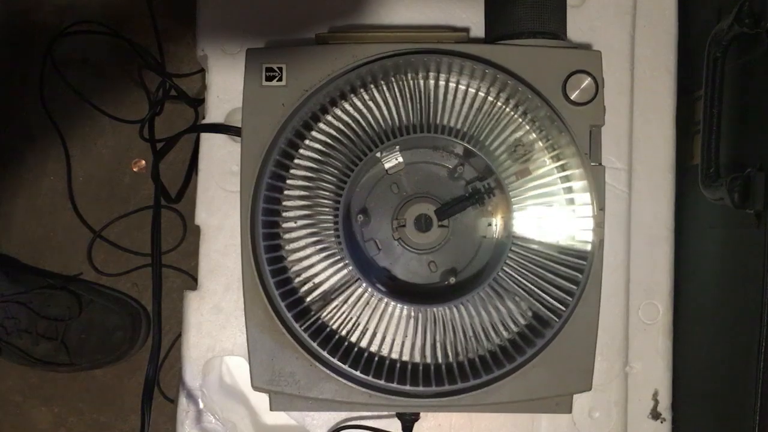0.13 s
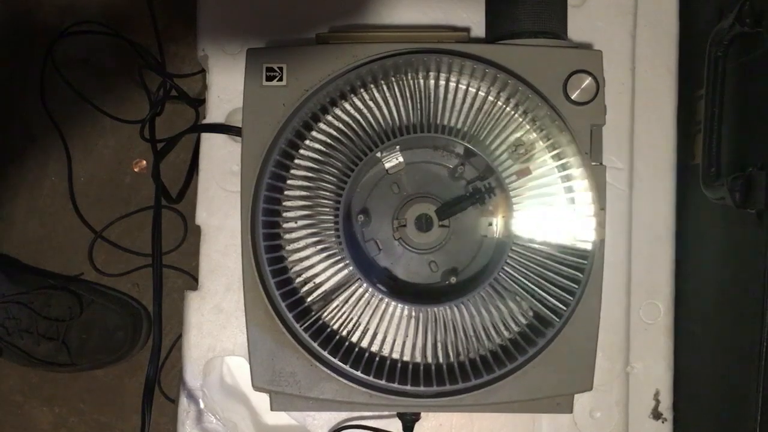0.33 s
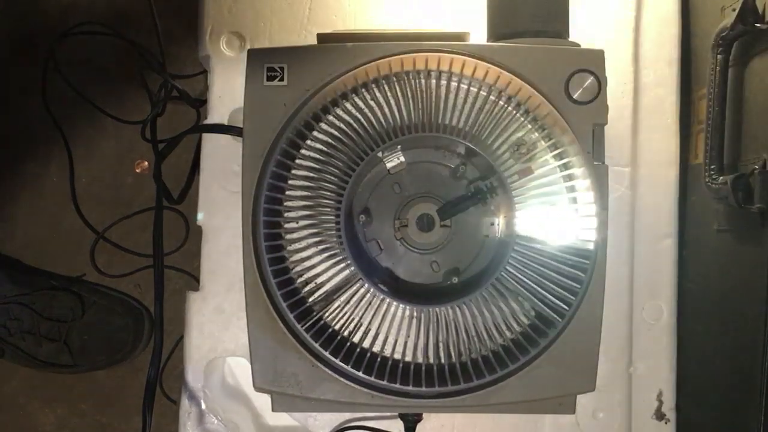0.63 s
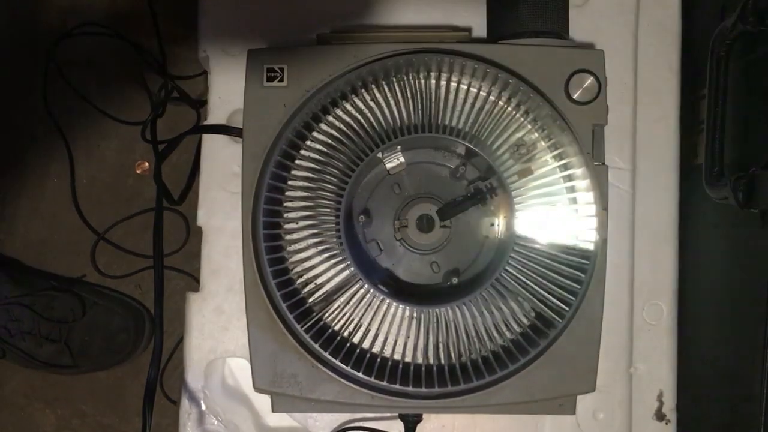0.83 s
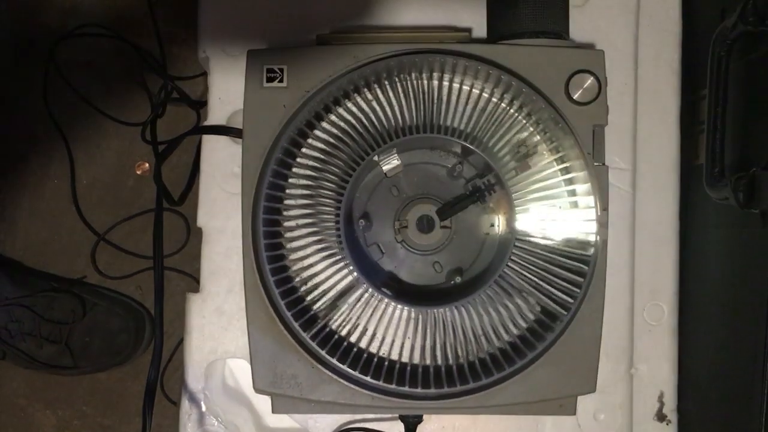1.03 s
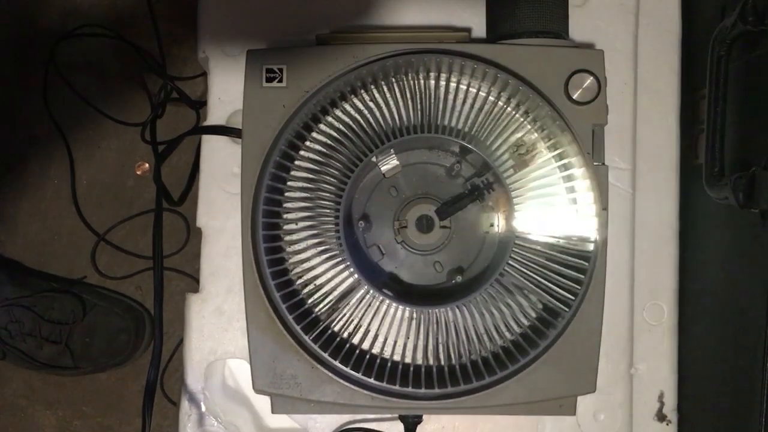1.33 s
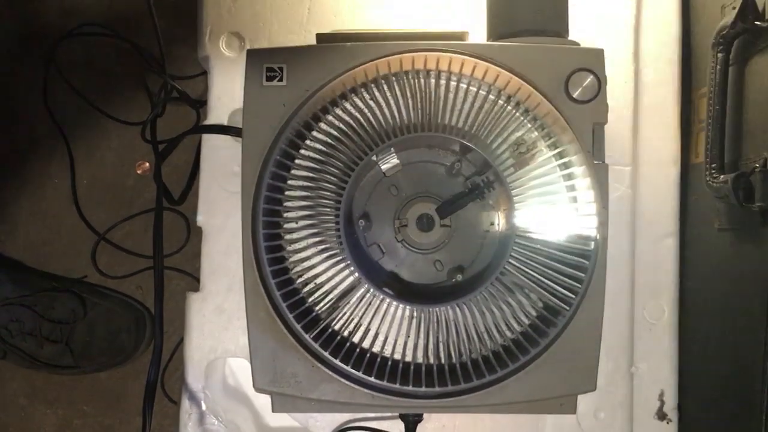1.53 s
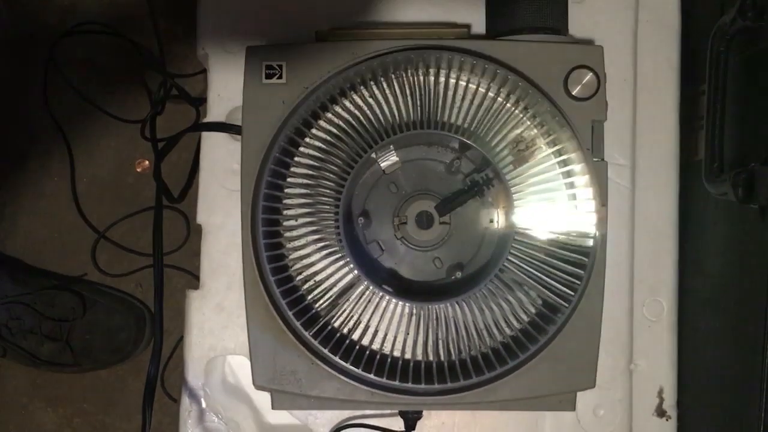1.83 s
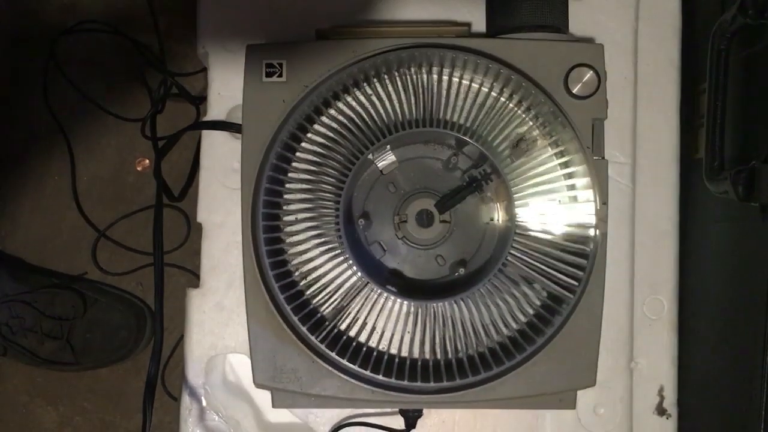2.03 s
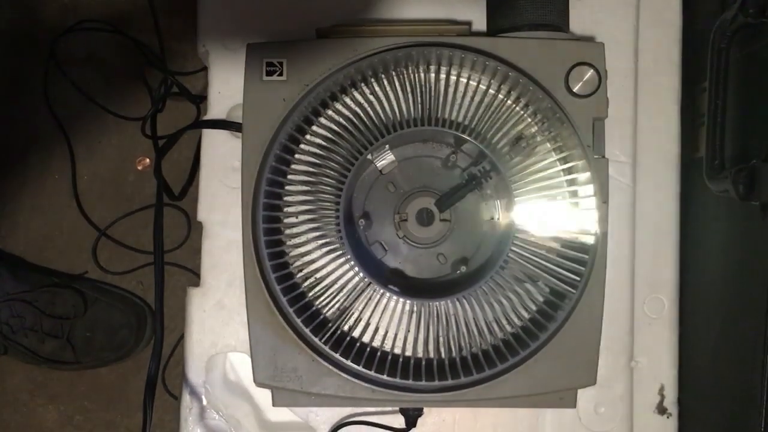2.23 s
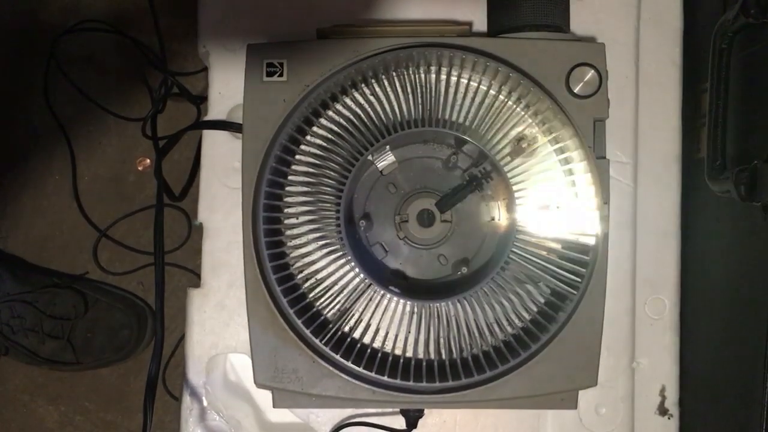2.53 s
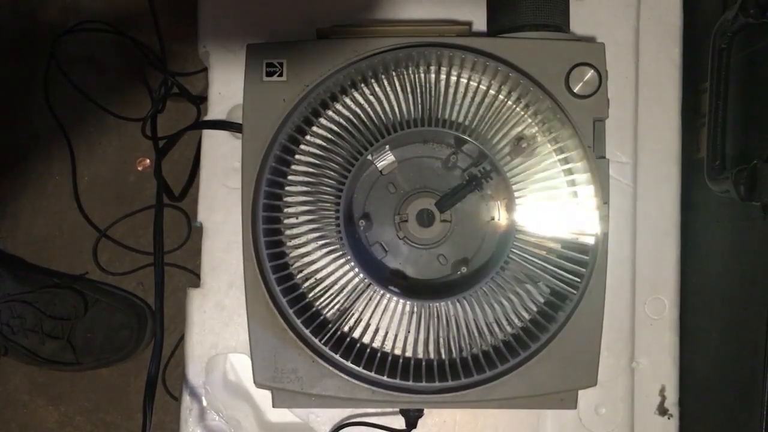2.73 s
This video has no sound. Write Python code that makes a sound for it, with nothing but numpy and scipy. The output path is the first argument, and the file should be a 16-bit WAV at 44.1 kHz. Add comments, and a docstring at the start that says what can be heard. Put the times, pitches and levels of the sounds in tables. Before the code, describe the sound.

A slide projector cycles close up in a small room. After a very brief silence, hum and fan noise cut in abruptly at 0.08 seconds. Clicks at 0.27 lead to a loud bright clack at 0.57, then hollow clunks and light rattles. The cycle repeats from 1.24, with its hardest snap at 1.54, and from 2.21, with softer, scattered clacks from 2.5 to 2.9. Faint rapid ticking runs throughout.

```python
"""A carousel slide projector cycles through slide changes: cams, levers, shutter and tray strike and slide.
Strikes are impacts and chatter through the resonances of the case, with short rings and hollow knocks;
slides are fine grains under a stroke. Below them a motor hums in wavering tones, a shaft ticks once a
turn and a fan blows banded noise. The mechanism sounds in a small room of feedback delays.
The sound starts abruptly after a short silence."""
import sys
import numpy as np
from scipy import signal
from scipy.fft import rfft, irfft, next_fast_len
from scipy.io import wavfile

SR = 44100
rng = np.random.default_rng(int(sys.argv[2]) if len(sys.argv) > 2 else 0)


def put_to_file(sound):
    """Save the sound as 16-bit audio at rate SR, in the file named by the first command-line argument."""
    columns = np.atleast_2d(sound).T  # one column per channel
    safe = np.clip(columns, -1, 1)
    whole_steps = np.round(safe * 32767)
    wavfile.write(sys.argv[1], SR, whole_steps.astype(np.int16))


N = 127890

# Strikes of the mechanism; the levels are nominal, ahead of the chance of each blow:
# start_s [s], bright_db [dB peak, 3.5-8 kHz], thud_db [dB, 0.2-1.45 kHz], knock_db [dB, 1.45-3.5 kHz],
# fizz_db [dB, 8-16 kHz], decay_s [s, chatter decay before its stretch], ring_hz [Hz, pitch to aim for]
STRIKES = [(0.104, -35, -45.5, -42, -47, 0.025, 5930), (0.2657, -45, -38, -32, -56, 0.0055, 6150),
           (0.2745, -18.5, -22.5, -24, -40, 0.0028, 6060), (0.2783, -19, -28.5, -27.5, -36.5, 0.011, 5080),
           (0.4915, -27, -51, -29, -43, 0.0037, 4120), (0.5185, -21, -59, -36, -40, 0.0041, 6950),
           (0.5713, -7.5, -30, -18.5, -18, 0.0058, 4160), (0.596, -23, -29, -32, -33, 0.0052, 6400),
           (0.6104, -19.5, -30.5, -29.5, -33, 0.012, 4940), (0.6444, -31, -37.5, -57, -49, 0.014, 5920),
           (0.6591, -25, -28, -30.5, -44, 0.01, 4170), (0.6765, -20, -30, -25, -35.5, 0.0095, 4370),
           (0.7733, -30.5, -39.5, -38, -47, 0.011, 4520), (0.827, -18.5, -38, -27, -40, 0.0045, 4180),
           (0.902, -45, -42.5, -44, -55, 0.0084, 4580), (0.94, -32.5, -29.5, -46, -51, 0.0083, 6820),
           (0.949, -24, -38, -31, -34.5, 0.004, 7000), (0.9647, -36, -45, -48, -51, 0.0059, 7030),
           (1.2374, -25.5, -30.5, -31, -48, 0.0091, 4130), (1.248, -16.5, -31.5, -26.5, -51, 0.0033, 6150),
           (1.2518, -22.5, -29, -32.5, -34.5, 0.0077, 7100), (1.4654, -28.5, -31, -33.5, -44, 0.005, 4120),
           (1.492, -21, -34, -38, -41, 0.0052, 7210), (1.5446, -9.5, -28, -18.5, -20, 0.0067, 6160),
           (1.57, -26, -32, -53, -43, 0.016, 6370), (1.584, -22.5, -41, -29, -36, 0.01, 6970),
           (1.6212, -31, -38, -42, -48, 0.0098, 4380), (1.6355, -13.5, -26, -25, -36, 0.0064, 4200),
           (1.6563, -18, -24.5, -21, -32, 0.007, 4320), (1.6712, -40, -26, -38, -51, 0.0054, 4200),
           (1.7462, -33, -43.5, -40.5, -54, 0.026, 4410), (1.7997, -19, -32, -27, -37, 0.0041, 4170),
           (1.874, -46, -49, -40.5, -54, 0.005, 4510), (1.9132, -30.5, -33, -43, -48, 0.0082, 6830),
           (1.9217, -25, -44, -35.5, -35, 0.0038, 7020), (1.9367, -25.5, -30.5, -36, -37, 0.0037, 7190),
           (1.993, -52, -56, -40, -66, 0.0069, 4370), (2.212, -38, -32, -30.5, -61, 0.0094, 4400),
           (2.221, -13, -38, -28.5, -40, 0.0021, 6140), (2.2256, -19, -26, -28.5, -37, 0.0088, 5950),
           (2.4379, -32, -31, -36.5, -48, 0.0078, 4100), (2.4658, -18.5, -42, -32, -35, 0.003, 6980),
           (2.496, -32, -43, -40, -47, 0.0068, 4290), (2.509, -27, -37, -34.5, -39, 0.016, 6640),
           (2.544, -20.5, -30, -29.5, -37, 0.011, 6390), (2.5578, -17.5, -32.5, -29, -29, 0.013, 4490),
           (2.595, -25, -33, -47, -41, 0.0071, 5940), (2.6112, -23.5, -27.5, -39, -43, 0.0077, 4190),
           (2.6305, -38, -29.5, -31, -57, 0.0065, 6000), (2.6419, -30.5, -29, -53, -61, 0.0091, 5970),
           (2.7192, -29.5, -35.5, -37.5, -57, 0.007, 4570), (2.7364, -27, -36, -35.5, -55, 0.013, 4290),
           (2.773, -21, -30.5, -31.5, -43, 0.0052, 4400), (2.7934, -36, -42, -38.5, -54, 0.0069, 4520),
           (2.8473, -26, -29, -27.5, -39.5, 0.0049, 4550), (2.889, -27, -29, -38, -45, 0.0053, 6840)]
# Resonances of case and levers: pitch_hz [Hz], width_hz [Hz], level_db [dB, relative within a register]
CASE_MODES = [(221, 20, 6), (300, 57, 8), (417.4, 31, 1.5), (461, 21, 6), (534, 21, -2.5), (630, 230, 0.5),
              (1045, 50, 9.5), (1498, 470, 5), (1852, 150, 4), (2150, 20.6, 17), (2280, 94, 8.5),
              (2860, 240, -9), (4225, 440, 4), (4570, 320, -2), (5800, 55, 2), (6195, 83, 3.5),
              (6940, 17, 10.5), (9100, 50, -19), (9650, 120, 25.5), (11040, 180, 16), (12180, 1700, 23),
              (12900, 250, 4), (14800, 1600, 22)]

TURN_S = .0422   # one shaft turn at the reference tick
STRIKE = 1.9     # first impact, against a chatter of rms 1


def from_db(db):
    """Decibels to gain."""
    return 10 ** (np.asarray(db) / 20)


def rms_one(x):
    """Scale to rms 1."""
    return x / np.sqrt(np.mean(x ** 2) + 1e-20)


def drift(rate_hz):
    """Slow random wander of rms 1: noise through two equal poles, made at 1/40 of the sample rate."""
    pole = np.exp(-80 * np.pi * rate_hz / SR)
    noise = rng.standard_normal(N // 40 + 2002)
    slow = signal.lfilter([1], [1, -2 * pole, pole * pole], noise)[2000:]   # skip the settling
    return np.interp(np.arange(N) / 40, np.arange(len(slow)), rms_one(slow))


def band(x, low_hz, high_hz):
    """Band-pass with gentle edges."""
    return signal.sosfilt(signal.butter(2, [low_hz, high_hz], "band", fs=SR, output="sos"), x)


def grains(rate_per_s, spread_db):
    """Uneven micro-impacts of either sign at chance moments, rms 1."""
    sizes = from_db(spread_db * np.minimum(rng.exponential(1, N), 4))
    signed = sizes * rng.choice([-1, 1], N)
    return rms_one(signed * (rng.random(N) < rate_per_s / SR))


def case(x, low_hz, high_hz):
    """One register of the case: resonators in parallel with a plain share, scaled by impulse energy."""
    plain_db, chance_db = 5, 1.5   # unresonant share; how far each resonance's drive wanders
    # a lone impulse after the sound gauges the register's gain
    x = np.append(x, np.eye(1, 4096)[0]) + 1e-18
    out = from_db(plain_db) * x
    for pitch_hz, width_hz, level_db in CASE_MODES:
        if low_hz <= pitch_hz < high_hz:
            pole = np.exp(-np.pi * width_hz / SR)
            luck = np.append(from_db(chance_db * drift(15.0)), np.ones(4096))
            feed = [(1 - pole * pole) / 2, 0, (pole * pole - 1) / 2]
            back = [1, -2 * pole * np.cos(2 * np.pi * pitch_hz / SR), pole * pole]
            out = out + from_db(level_db) * signal.lfilter(feed, back, luck * x)
    out = band(out, low_hz, high_hz)
    return out[:N] / np.sqrt(np.sum(out[N:] ** 2))


def shaft_turns():
    """Turns of the shaft counted over time; each turn takes a little longer than the last."""
    tick_s, slowing_s = .382, 7.5e-6   # time of turn 0; delay per turn squared
    k = np.arange(-12, 64)
    return np.interp(np.arange(N) / SR, tick_s + TURN_S * k + slowing_s * k * k, k)


def hum():
    """Motor hum: steady low sines that waver in level and phase and swell once a shaft turn."""
    # Hum tones: pitch_hz [Hz], level_db [dB rms before waver and swell], waver_db [dB]
    hum_tones = [(60, -56, 3), (144, -53, 4), (240, -56, 2), (120, -38, 1.2), (175, -44.5, 1.5)]
    turn_share = 0.071   # depth of the swell
    t = np.arange(N) / SR
    tones = 0
    for pitch_hz, level_db, waver_db in hum_tones:
        level = np.sqrt(2) * from_db(level_db + waver_db * drift(2.6))
        phase_wander = 0.17 * waver_db * drift(9.0)   # radians
        tones = tones + level * np.sin(2 * np.pi * pitch_hz * t + phase_wander)
    swell = 1 + turn_share * np.cos(2 * np.pi * shaft_turns() + 3.8)
    return swell * tones


def fan():
    """Fan air: noise in quarter-octave bands, each flickering a little in level."""
    # Spectrum of the air: pitch_hz [Hz], level_db [dB per Hz, relative]
    air_spectrum = [(20, -44), (35, -13), (60, -11), (90, -8.5), (140, -5), (200, -11), (320, -12.5),
                    (480, -11.5), (580, -22.5), (750, -10), (950, -19.5), (1200, -13), (1600, -20),
                    (2200, -16), (2650, -26), (3200, -37), (4000, -36.5), (6500, -39), (10000, -43),
                    (12500, -43.5), (16000, -43)]
    fan_db, patchy_db = -40.5, -1.5   # overall rms; flicker of each band
    edges_hz = 20 * 2 ** np.arange(0, 10, 1 / 4)
    white = rng.standard_normal((2, N))   # neighbouring bands take different noise
    pitch_hz, level_db = np.transpose(air_spectrum)
    out = 0
    for k, (low_hz, high_hz) in enumerate(zip(edges_hz, edges_hz[1:])):
        band_db = np.interp(np.log(low_hz * high_hz) / 2, np.log(pitch_hz), level_db)
        out = out + from_db(band_db + patchy_db * drift(3.15)) * band(white[k % 2], low_hz, high_hz)
    return from_db(fan_db) * rms_one(out)


def ticks():
    """Shaft tick once a turn: a click and a little fading chatter, band-passed and dulled."""
    level_db, spread_db = -27.5, 1.5   # level before the filters; chance from turn to turn
    decay_s, top_hz = .004, 3100
    turns = shaft_turns()
    since_s = (turns % 1) * TURN_S
    sizes = from_db(level_db + spread_db * rng.standard_normal(80))
    size = sizes[np.floor(turns).astype(int) + 12]   # the count starts at -12
    chatter = np.where(since_s < 1 / SR, STRIKE, grains(8000, spread_db=-3.5))
    tick = band(size * np.exp(-since_s / decay_s) * chatter, 1200, 2670)
    return signal.sosfilt(signal.butter(3, top_hz, fs=SR, output="sos"), tick)


def slides():
    """Parts rubbing: fine uneven grains under strokes that swell and fade, into two upper registers."""
    # Strokes: start_s [s], length_s [s], level_db [dB], brightness_db [dB, top register over the lower]
    strokes = [(0.073, 0.2, -53, -3.5), (0.537, 0.094, -48, -2), (0.565, 0.017, -34, 2),
               (0.574, 0.096, -39, 0), (0.683, 0.05, -43, -17), (0.769, 0.08, -45, -4),
               (0.956, 0.043, -51.5, 2.5), (1.052, 0.17, -50.5, -3.5), (1.511, 0.094, -49.5, 1),
               (1.538, 0.018, -31, 7), (1.56, 0.12, -54, 6), (1.652, 0.06, -39.5, -15),
               (1.741, 0.095, -47, -2), (1.943, 0.027, -62, 2), (2.028, 0.16, -49, -4.5),
               (2.227, 0.035, -53, 0), (2.498, 0.059, -44, -3), (2.564, 0.11, -56, 0),
               (2.624, 0.038, -46, -10), (2.714, 0.094, -48.5, -1)]
    grains_per_s, rise_share = 2200, 0.13   # density; share of the stroke spent rising
    t = np.arange(N) / SR
    dull, bright = 0, 0
    for start_s, length_s, level_db, brightness_db in strokes:
        part = (t - start_s) / length_s
        ramp = np.minimum(part / rise_share, (1 - part) / (1 - rise_share))
        stroke = from_db(level_db) * np.sin(np.pi / 2 * np.clip(ramp, 0, 1)) ** 2
        dull = dull + stroke
        bright = bright + stroke * from_db(brightness_db)
    rub = grains(grains_per_s, spread_db=2.5) * from_db(1.8 * drift(120.0))
    return case(dull * rub, 2000, 8000) + case(bright * rub, 8000, 17000)


def contacts():
    """Strikes: an impact and a burst of chatter that holds, then drops, weighted in four case registers."""
    crest_db = 12.5   # peak over rms of the bright register
    hold = 1.35       # 1 = plain dying away, more = holds, then drops
    rise_s = np.array([[.0025], [.0007], [.0007], [.0007]])   # thud, knock, bright, fizz
    t = np.arange(int(.1 * SR)) / SR
    force = np.zeros((4, N + SR))
    chatter = grains(4000, spread_db=1.5)
    for start_s, bright_db, thud_db, knock_db, fizz_db, decay_s, _ in STRIKES:
        i = int(start_s * SR)
        levels = from_db([[thud_db], [knock_db], [bright_db - crest_db], [fizz_db]])
        rise = 1.2 - np.exp(-t / rise_s)   # from 0.2 towards 1.2
        fall = np.exp(-(t / max(1.14 * decay_s, .001)) ** hold)
        force[:, i:i + len(t)] += levels * rise * fall
        chatter[i] = STRIKE
    edges_hz = [200, 1450, 3500, 8000, 17000]
    return sum(case(f[:N] * chatter, low_hz, high_hz)
               for f, low_hz, high_hz in zip(force, edges_hz, edges_hz[1:]))


def ring_modes(blows, t60_s, rise):
    """Dying sines, one a blow (start_s, level_db, pitch_hz), on the case resonance nearest its pitch."""
    out = np.zeros(N + SR)
    modes_hz = np.array(CASE_MODES)[:, 0]
    t = np.arange(int(.1 * SR)) / SR
    for start_s, level_db, pitch_hz in blows:
        i = int(start_s * SR)
        mode_hz = modes_hz[np.argmin(abs(modes_hz - pitch_hz))]
        level = from_db(level_db - 60 * t / t60_s)
        out[i:i + len(t)] += level * rise(t) * np.sin(2 * np.pi * mode_hz * t)
    return out[:N]


def rings():
    """Each struck part rings briefly on one resonance, from 1 ms after its strike."""
    ring_db = -15   # relative to the bright peak
    blows = [(start_s + .001, bright_db + ring_db, ring_hz) for start_s, bright_db, *_, ring_hz in STRIKES]
    return ring_modes(blows, t60_s=0.031, rise=np.ones_like)


def knocks():
    """Hollow knocks of slide and tray on the case: low resonances that swell quickly and die away."""
    # Knocks: start_s [s], level_db [dB peak before the swell and decay], pitch_hz [Hz, pitch to aim for]
    hollow_knocks = [(0.2756, -29, 290), (0.661, -28, 650), (0.675, -21, 1040), (0.676, -24, 450),
                     (0.775, -36, 420), (1.653, -21, 520), (1.668, -26, 420), (1.749, -25, 415),
                     (2.629, -29, 650), (2.721, -28, 450)]
    rise_s = 0.0034
    return ring_modes(hollow_knocks, t60_s=0.052, rise=lambda t: 1 - np.exp(-t / rise_s))


def room(x):
    """Small room: eight feedback delays, duller on every round, summed with alternating sign."""
    t60_s, wall_cut_hz = 0.21, 4000   # decay of the lows; corner of the loss on each round
    size = next_fast_len(N + SR)
    w = 2 * np.pi * np.arange(size // 2 + 1) / size   # radians per sample
    dull = 1 / np.sqrt(1 + (w * SR / (2 * np.pi * wall_cut_hz)) ** 2)
    response = 0
    for k, lag_s in enumerate(rng.uniform(.006, .025, 8)):
        loop = from_db(-60 * lag_s / t60_s) * dull * np.exp(-1j * w * lag_s * SR)
        response = response + (-1) ** k * loop / (1 - loop)
    return irfft(rfft(x, size) * response, size)[:N]


def scene():
    """Mechanism with its room, over hum and fan."""
    room_db = -13
    works = contacts() + rings() + knocks() + slides() + ticks()
    return (works + from_db(room_db) * room(works) + hum() + fan())[None]


def record(dry):
    """Silence before the abrupt start; a steep low-pass removes the top."""
    start_s, cutoff_hz = .0835, 16200   # cutoff: where the loss reaches 60 dB
    opened = dry * (np.arange(N) >= start_s * SR)
    return signal.sosfilt(signal.cheby2(14, 60, cutoff_hz, fs=SR, output="sos"), opened)


dry = scene()
out = record(dry)
put_to_file(out)
```